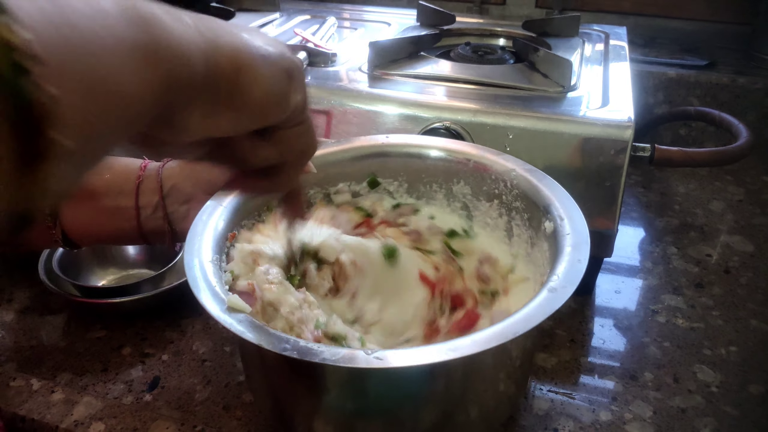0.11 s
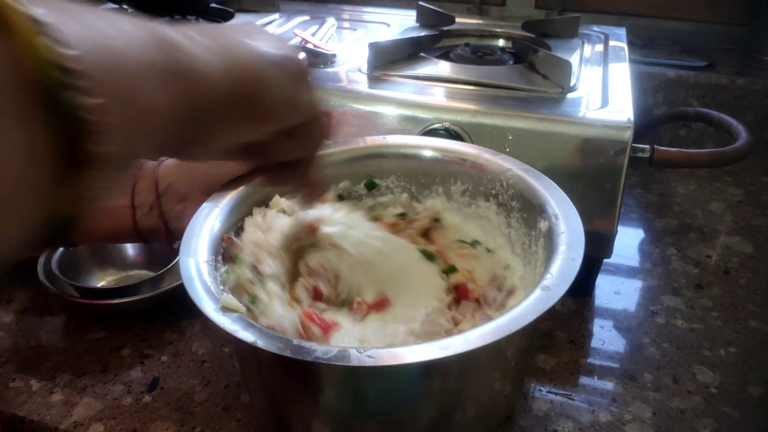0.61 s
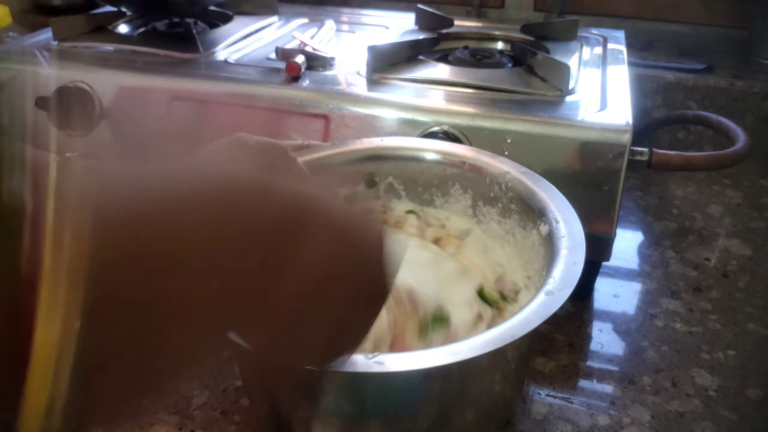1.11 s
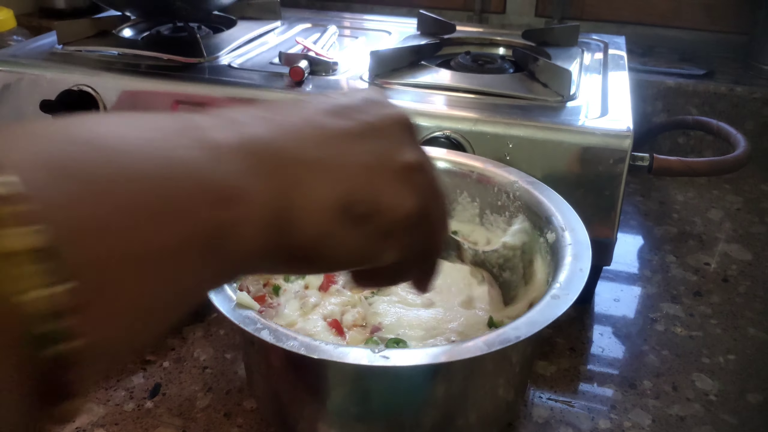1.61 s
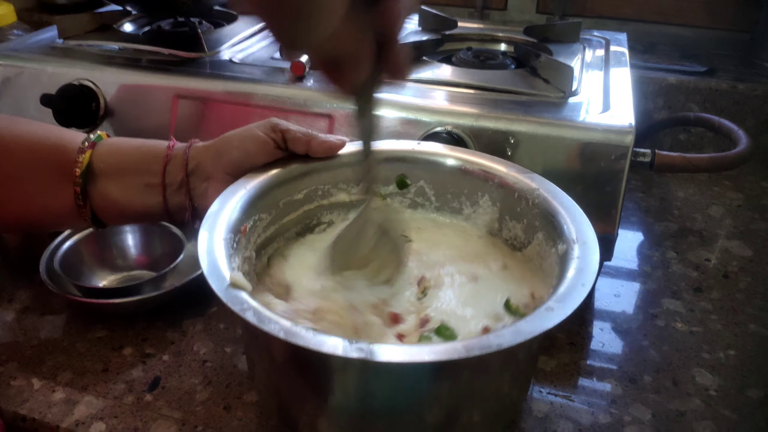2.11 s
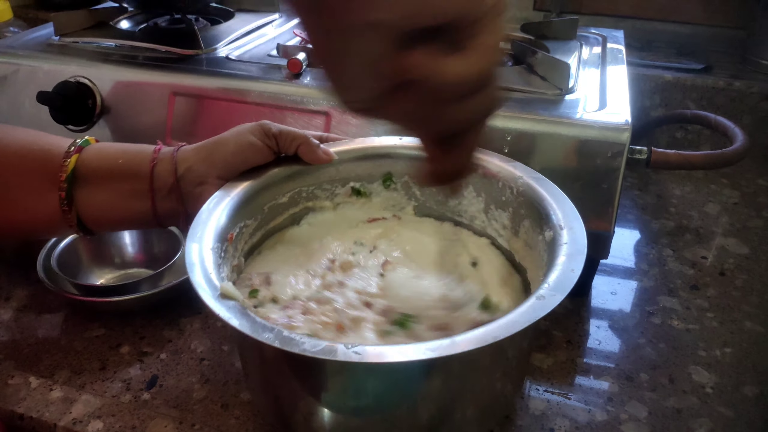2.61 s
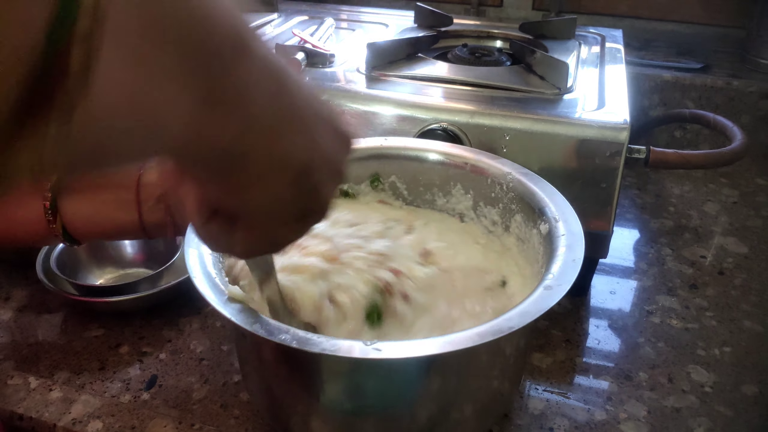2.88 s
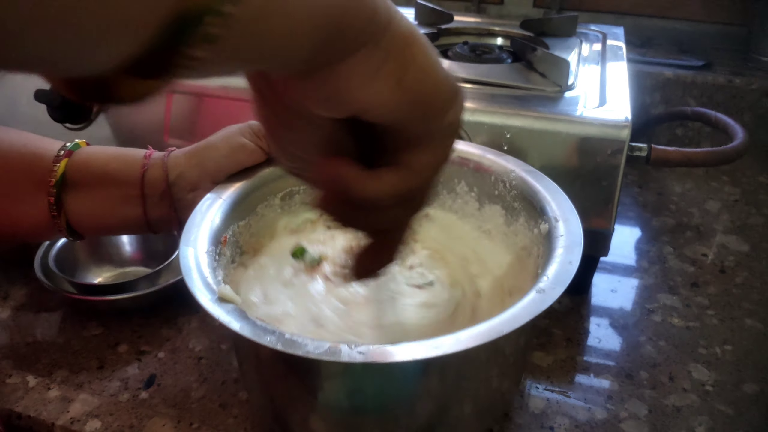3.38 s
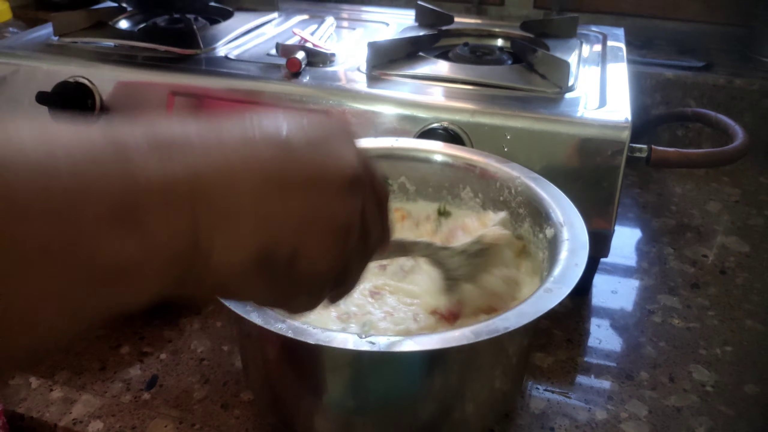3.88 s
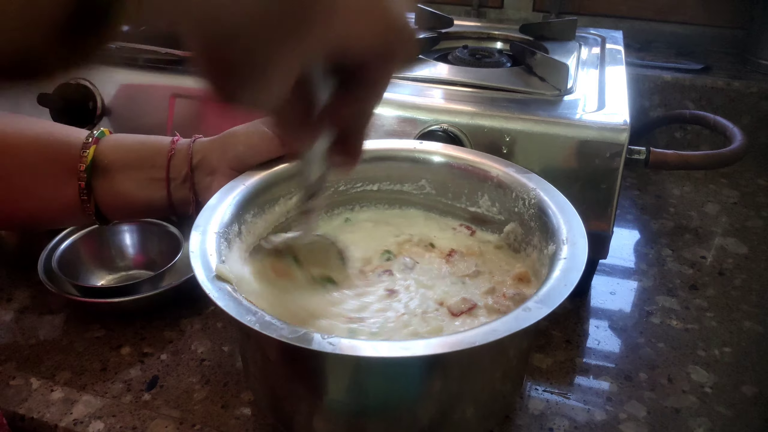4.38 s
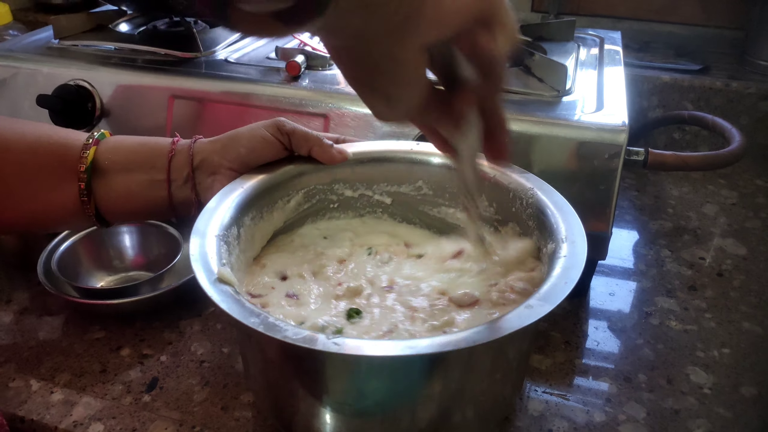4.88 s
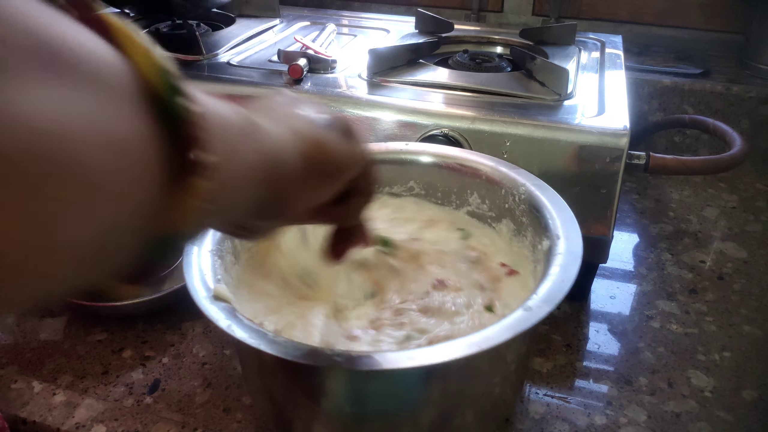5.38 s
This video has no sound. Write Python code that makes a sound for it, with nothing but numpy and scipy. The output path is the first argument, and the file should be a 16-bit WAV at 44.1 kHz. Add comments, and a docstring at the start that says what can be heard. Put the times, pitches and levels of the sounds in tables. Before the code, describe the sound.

Hand stirring of thick batter in a steel pot: sharp clinks, short gritty scrapes, low bumps on the counter, small squelches, quiet kitchen.

```python
"""Steel spoon scraping and clinking in a steel pot of thick batter, on a stone counter in a hard kitchen.
Friction is gritty noise through the wall modes; taps and landings are short forces through those modes.
Base, slab and handle ring as damped sines; air pockets squelch as gliding tones; the air hums as noise.
Impacts and squelches get diffuse room tails. A close phone's noise suppressor darkens the gaps.
"""
import sys
import numpy as np
from scipy import signal
from scipy.fft import rfft, irfft, next_fast_len
from scipy.io import wavfile
from scipy.ndimage import uniform_filter1d, map_coordinates

SR = 44100
rng = np.random.default_rng(int(sys.argv[2]) if len(sys.argv) > 2 else 0)


def ratio_of_db(decibels):
    """Turn decibels (scalar or array-like) into linear amplitude factors; 0 dB maps to 1."""
    return 10 ** (np.asarray(decibels, float) / 20)


def waveform_to_disk(signal):
    """Save audio, clipped to [-1, 1], as 16-bit WAV at the path in sys.argv[1]."""
    frames = np.transpose(np.atleast_2d(signal))
    scaled = np.clip(frames, -1, 1) * 32767
    samples = np.round(scaled).astype(np.int16)
    wavfile.write(sys.argv[1], SR, samples)


N = 242550

# Levels in the tables are relative dB unless noted.
# Kitchen hum spectrum. Each row: frequency in Hz, density in dB.
AIR_SPECTRUM = [(18, -49), (30, -27), (98, -10), (645, -19), (1420, -23.5), (2330, -32), (2870, -25),
                (14600, -47.5), (15800, -22.5)]
# Hum level. Each row: time in seconds, rms in dB.
AIR_LEVEL = [(0, -52.5), (3, -63), (4.001, -56), (5.5, -67.5)]
# Wall whine under the moving batter, response applied twice. Each row: centre in Hz, width in Hz, level in dB.
WHINE_MODES = [(1780, 76, -7), (2132, 87, -5), (2713, 69, -10.5)]
# Whine level. Each row: time in seconds, rms in dB.
WHINE_LEVEL = [(0, -57.5), (1.5, -60), (2.4, -59.5), (3.2, -60.5), (4, -66), (4.6, -65.5), (5, -60.5),
               (5.5, -74)]
# Room decay. Each row: frequency in Hz, t60 in seconds.
KITCHEN_T60 = [(100, 1), (300, 0.47), (1200, 0.49), (3000, 0.59), (5000, 0.32), (12000, 0.43)]
# Air pockets closing in the batter. Each row: start in seconds, level in dB, first pitch in Hz,
# last pitch in Hz, length in seconds.
SQUELCHES = [(.36, -53, 1112, 1200, 0.092), (0.428, -45.5, 1527, 1530, 0.018),
             (0.46, -46.5, 2630, 3015, 0.025), (1.847, -47.5, 386, 418.7, 0.049),
             (1.963, -46, 610, 440, 0.058), (2.025, -44.5, 289.5, 276.3, 0.012),
             (2.588, -58, 1202, 1310, 0.091), (2.633, -60, 453, 480, 0.044), (2.765, -53, 791.5, 801, 0.07),
             (2.808, -50, 1200, 1283, 0.07), (2.812, -60.5, 273.2, 269.5, 0.11),
             (4.152, -48, 341, 273, 0.11), (4.355, -59.5, 1176, 1152, 0.049),
             (4.839, -59.5, 1182, 1200, 0.15), (4.847, -57.5, 378.3, 439, 0.11)]
# Pot base landing on stone. Each row: start in seconds, base and slab level in dB, boom level in dB,
# wall jolt level in dB, rise of the base ring in seconds.
THUDS = [(0.003, -54.5, -42, -27, 0.0089), (0.139, -23, -29.5, -23.5, 0.0029),
         (0.543, -26.5, -42.5, -27.5, 0.0053), (1.066, -27.5, -34.5, -27, 0.0062),
         (1.133, -36.5, -70.5, -34, 0.0039), (3.051, -23, -31, -28, 0.0037),
         (3.517, -28.5, -49, -30.5, 0.002), (3.771, -30, -43.5, -30.5, 0.0012),
         (3.801, -35.5, -52, -54.5, 0.0038), (5.106, -40.5, -72, -30, 0.0048),
         (5.393, -28, -51, -16, 0.0011), (5.434, -24.5, -33.5, -27, 0.0012)]
# Colour of a landing's jolt on the wall. Each row: frequency in Hz, level in dB.
JOLT_COLOUR = [(400, 0.5), (900, -2.5), (2100, -4.5), (4000, -37.5)]
# Pot base modes. Each row: frequency in Hz, level in dB, t60 in seconds.
BASE_MODES = [(121, -7, 0.13), (175.8, -16, 0.3), (331.6, -6.5, 0.18), (367.2, -7.5, 0.14),
              (386, -10.5, 0.026), (486.5, -19, 0.24)]
# Stone counter modes. Each row: frequency in Hz, level in dB, t60 in seconds.
SLAB_MODES = [(250, 0, .42), (280, 5, .17)]
# Pot wall modes, damped by batter. Each row: centre in Hz, width in Hz, level in dB.
POT_MODES = [(390.3, 29, 1), (499.3, 14, 3), (668.6, 20, -5), (738.3, 14, 0), (901, 12, -7.5),
             (1104, 20, -6.5), (1163.5, 19, -4), (1226, 22, -2), (1470, 21, -15), (1954, 31, 5),
             (2270, 8.5, -1), (3130, 110, 0), (4794, 230, -3.5)]
# Spoon taps on the wall. Each row: start in seconds, knock level in dB, height (0 base, 1 rim),
# tick level in dB, tick slope above its centre in dB per octave.
CLINKS = [(0.0188, -32, 0.52, -12.5, -10.5), (0.1325, -23.5, 0.36, -36.5, -19),
          (0.4544, -22.5, 1.1, -49, -9), (0.509, -53.5, 1.4, -34, -6.5), (0.5505, -16.5, 0.11, -27, -17),
          (0.6796, -6.5, 0.31, -8, -4.5), (0.848, -30, 0.97, -32.5, 2), (0.903, -53, .8, -37, -3),
          (1.1862, -11, .5, -20, -8), (1.279, -62.5, 0.88, -32, 1), (1.4509, -67, .9, -45, 6),
          (1.9834, -28.5, 0.92, -33, 7), (2.2019, -66, 1, -37.5, 1), (3.0253, -53, 0.41, -32, -1),
          (3.0503, -26.5, 0.25, -27, -3), (3.0575, -22.5, 0.4, -40.5, 2), (3.0743, -17.5, 0.4, -32.5, -12),
          (3.0875, -5, .44, -30, -12), (3.6106, -19, .55, -40, -4), (3.6286, -20, 0.31, -47.5, -13),
          (3.716, -65, 0.85, -45, 7.5), (3.77, -54, 0.083, -43, 2.5), (3.836, -66, 1.1, -52, -13.5),
          (3.917, -36, 0.9, -30.5, -16.5), (3.926, -26, 1, -43, -10), (4.7214, -37.5, 1.2, -43, -13.5),
          (4.777, -33, 1.05, -48, 13), (5.0579, -61.5, 0.52, -24.5, -13), (5.107, -28, .66, -50, -6),
          (5.3375, -26.5, 1.2, -26.5, 3.5), (5.38, -32, .9, -44, -9.5), (5.3925, -11, 1.11, -17, -9.5),
          (5.393, -12, -0.046, -53, -11.5), (5.434, -17.5, .4, -46, -11.5)]
# Handle tipping the rim. Each row: start in seconds, level in dB.
TINKS = [(3.338, -13.5)]
# Spoon handle modes. Each row: frequency in Hz, level in dB, t60 in seconds.
HANDLE_MODES = [(1934, -3, 0.023), (2030, -2, 0.023), (2970, -28.5, 0.068), (5035, -3, 0.02),
                (5950, -19, 0.026), (7900, -9, 0.0095), (10500, -18.5, 0.017)]
# Spoon sliding along the steel. Each row: start in seconds, length in seconds, level in dB,
# swell by the end in dB, edge in dB (scaled per friction layer).
STROKES = [(0.0, 0.0074, -48, -2, 6), (0.01, 0.031, -44, -5.5, -16.5), (0.126, 0.048, -41.5, 0.5, -2.5),
           (0.277, .09, -58, 9, 1), (0.386, 0.079, -57, 5, 3), (0.539, 0.077, -46, 4.5, -1.5),
           (0.679, .01, -33, -3, -2), (0.74, 0.15, -53, 0, -3.5), (0.889, 0.41, -55.5, 3.5, -6.5),
           (1.04, 0.12, -44.5, -9, -4), (1.168, 0.053, -44, -10, 3), (1.782, 0.058, -56.5, 4, 10),
           (1.827, .13, -51.5, 4, -2), (1.83, 0.045, -54, -4.5, -24.5), (2.191, 0.014, -52, -6.5, -2.5),
           (2.519, 0.098, -61, 8.5, 2), (2.629, 0.15, -55, 4.5, 6.5), (2.671, 0.041, -65.5, -6, -6.5),
           (2.798, 0.17, -55, 0.5, -2.5), (3.027, 0.084, -49.5, 1.5, -4.5), (3.134, 0.18, -56.5, 3, -3.5),
           (3.335, .012, -43, -1, -7), (3.403, 0.074, -53.5, 5.5, 2), (3.492, 0.2, -48.5, -7, -2.5),
           (3.716, 0.18, -62, -7, -6.5), (3.91, 0.049, -46, -6, -14), (4.107, 0.093, -54, 4, 5.5),
           (4.245, 0.14, -60.5, 7, 12), (4.713, 0.011, -59, -1, 4), (4.807, 0.12, -59.5, 5.5, 7.5),
           (4.924, 0.39, -50.5, -8.5, 2), (5.081, 0.39, -45.5, -16, -6.5), (5.296, 0.083, -47, -7, -9),
           (5.392, .012, -39, -2, 1), (5.416, 0.067, -47.5, -7, -6.5)]
# Low friction hiss. Each row: frequency in Hz, density in dB.
RASP_SPECTRUM = [(2000, -42.5), (2700, -25.5), (3300, -31.5), (3950, -14.5), (4350, -4.5), (5000, -3),
                 (5900, -9), (6800, -23), (8000, -16.5), (16000, -120)]
# High friction hiss. Each row: frequency in Hz, density in dB.
FIZZ_SPECTRUM = [(3530, -66.5), (6000, -10), (8130, -7), (9260, -7), (12200, -4.5), (13300, -11.5),
                 (14900, -3.5), (15800, -13)]
# Rubbed wall, response applied twice. Each row: centre in Hz, width in Hz, level in dB.
RUBBED_MODES = [(1200, 280, 0), (1688, 300, 2.5), (2140, 160, 4), (2640, 110, -3), (2550, 440, -3),
                (3460, 50, 2)]
# Left-right difference of the scrape's treble. Each row: time in seconds, gain in dB.
SCRAPE_SIDE = [(4.7, -34.5), (4.8, -16.5)]
# Microphone port response. Each row: frequency in Hz, gain in dB.
MIC_RESPONSE = [(35, -8.5), (80, -1), (2400, 4.5), (3500, -3), (4300, 1)]

RING_SAMPLES, ECHO_SAMPLES = SR * 2 // 3, SR * 2 // 5
SMOOTH_DB, STREAKY_DB = 2, 4.6  # rms depth of patches in pitch and time
FOOT_HZ, RIM_HZ = 570, 2320  # knock pitch at base and rim
NARROW_DB = 5.5  # knock loss one octave off pitch, growing as the square
TICK_HZ, TICK_SKIRT_DB_PER_OCT = 4700, 10  # tick centre; loss below it
BELLY_HEIGHT, BELLY_SPAN = 0.55, 0.08  # taps at mid height make the wall sing
BELLY_HZ, BELLY_DB, BELLY_OCTAVES = 1196, 2, 0.15
ATTACK_S, DRAG_ATTACK_S = 0.034, 0.059  # at most a third of the stroke
RASP_FADE_DB_PER_S, FIZZ_FADE_DB_PER_S, RING_FADE_DB_PER_S = 113, 170, 120
TOP_HZ, EDGE_HZ = 15700, 16700  # faint above the first, silent above the second


def unit(x):
    """Scale to rms 1."""
    return x / np.sqrt(np.mean(x ** 2) + 1e-20)


def along(points, hz):
    """Read (Hz, value) points on a log frequency axis."""
    f, value = np.transpose(points)
    return np.interp(np.log(hz + 1), np.log(f + 1), value)


def over_time(points):
    """Gain per sample from (seconds, dB) points."""
    return ratio_of_db(np.interp(np.arange(N) / SR, *np.transpose(points)))


def filtered(x, response):
    """Multiply the spectrum of x by a function of frequency."""
    size = 2 * next_fast_len(x.shape[-1] // 2 + 4096)
    spectrum = rfft(x, size) * response(np.fft.rfftfreq(size, 1 / SR))
    return irfft(spectrum, size)[..., :x.shape[-1]]


def causal(gain):
    """Minimum-phase response with this gain, by folding the cepstrum."""
    cepstrum = irfft(np.log(gain + 1e-6))
    half = len(cepstrum) // 2
    cepstrum[1:half] *= 2
    cepstrum[half + 1:] = 0
    return np.exp(rfft(cepstrum))[:len(gain)]


def resonances(modes, f):
    """Sum of second-order band-pass modes with alternating signs."""
    total = 0
    for k, (centre, width, db) in enumerate(modes):
        mode = 1j * f * width / (centre ** 2 - f ** 2 + 1j * f * width)
        total = total + (-1) ** k * ratio_of_db(db) * mode
    return total


def gritty(grit_db, patchy_db, tick, size, count=3):
    """Noise modulated by grains, by patches (count bins by size frames) and by sparse loud ticks."""
    z = signal.stft(rng.standard_normal(N), nperseg=256)[2]
    field = uniform_filter1d(rng.standard_normal(z.shape), size=count, axis=0)
    field = uniform_filter1d(field, size=size, axis=1)
    noise = unit(signal.istft(z * ratio_of_db(patchy_db * unit(field)), nperseg=256)[1][:N])
    grains = uniform_filter1d(rng.standard_normal(N), size=40)
    # hard bits caught under the spoon, 120 per second on average
    tick_size = ratio_of_db(12 + 3 * np.minimum(rng.exponential(size=N), 2))
    ticks = (rng.random(N) < 120 / SR) * tick_size
    return unit(noise * ratio_of_db(grit_db * unit(grains)) + tick * ticks)


def add(out, s, sound):
    """Mix in from 64 samples before s, the lead-in that blow() pads."""
    part = out[max(round(s * SR) - 64, 0):][:len(sound)]
    part += sound[:len(part)]


def room_tail():
    """Fresh diffuse noise tail; each frequency decays at its own rate."""
    hz, t, z = signal.stft(rng.standard_normal(ECHO_SAMPLES), SR, nperseg=256)
    decay = ratio_of_db(-60 * t / along(KITCHEN_T60, hz)[:, None])
    tail = signal.istft(z * decay, SR, nperseg=256)[1][:ECHO_SAMPLES]
    # counter and stove answer first and loudest
    tail *= 1 + 1.4 * np.exp(-np.arange(len(tail)) / (0.0034 * SR))
    tail[:round(0.002 * SR)] = 0
    tail /= np.linalg.norm(tail)
    return filtered(tail, lambda f: 1 / np.sqrt(1 + (f / 5000) ** 2))  # walls swallow treble


def in_room(dry, wet_db):
    """A sound plus its convolution with a fresh room tail."""
    wet = signal.fftconvolve(dry, room_tail())
    return np.pad(dry, (0, ECHO_SAMPLES - 1)) + ratio_of_db(wet_db) * wet


def rung(modes, rise_s, scatter_db, waver_db):
    """Damped sines of scattered strength, wavering as close neighbours beat."""
    t = np.arange(RING_SAMPLES) / SR
    ring = np.zeros(RING_SAMPLES)
    for hz, db, t60 in modes:
        waver = map_coordinates(rng.standard_normal(40), [t * 24])  # 24 points per second
        level_db = db + scatter_db * rng.standard_normal() + waver_db * waver - 60 * t / t60
        ring += ratio_of_db(level_db) * np.sin(2 * np.pi * hz * t)
    return ring * (1 - np.exp(-t / rise_s))


def blow(colour, chatter_db, ring):
    """One sharp force and its decaying chatter, coloured, partly through the wall modes."""
    t = np.arange(SR // 3) / SR
    force = ratio_of_db(chatter_db - 60 * t / 0.009) * rng.standard_normal(len(t))  # chatter t60 9 ms
    force[0] = 1
    force /= np.linalg.norm(force)
    points = [(60, -120)] + colour

    def struck_wall(f):
        shape = causal(ratio_of_db(along(points, f)) / np.sqrt(f + 100))
        return shape * (1 - ring + 4 * ring * resonances(POT_MODES, f))

    return filtered(np.pad(force, (64, 0)), struck_wall)


def strokes(offset_db, per_edge, attack_s, fade_db_per_s):
    """Gain of one friction layer: strokes rise, swell and fade, summed in power."""
    power = np.zeros(N // 32 + 2)
    t = np.arange(len(power)) * 32 / SR
    for s, length, db, swell_db, edge_db in STROKES:
        rise = np.clip((t - s) / min(attack_s, length / 3), 0, 1) ** 2
        swell = swell_db * np.clip((t - s) / length, 0, 1)
        fade = fade_db_per_s * np.maximum(t - s - length, 0)
        power += (rise * ratio_of_db(db + offset_db + per_edge * edge_db + swell - fade)) ** 2
    return np.interp(np.arange(N) / SR, t, np.sqrt(power))


def hum():
    """Kitchen air as band-wise wavering noise, plus the wall's soft whine as noise in narrow modes."""
    air = gritty(grit_db=-2.5, patchy_db=2.5, tick=0, size=40)
    air = unit(filtered(air, lambda f: ratio_of_db(along(AIR_SPECTRUM, f))))
    whine = gritty(grit_db=4, patchy_db=SMOOTH_DB, tick=0, size=40)
    whine = unit(filtered(whine, lambda f: resonances(WHINE_MODES, f) ** 2))
    return over_time(AIR_LEVEL) * air + over_time(WHINE_LEVEL) * whine


def squelches():
    """Each air pocket is a swelling, burbling tone with gliding, fluttering pitch."""
    out = np.zeros(N)
    for s, db, first_hz, last_hz, length in SQUELCHES:
        u = np.linspace(0, 1, round(length * SR))
        wobble = unit(uniform_filter1d(rng.standard_normal(len(u)), size=200))
        burble = unit(ratio_of_db(5.5 * wobble))
        swell = np.sin(np.pi * u ** 0.7) ** 2
        flutter = unit(uniform_filter1d(rng.standard_normal(len(u)), size=200))
        pitch_hz = first_hz + (last_hz - first_hz) * u + (20 + 0.018 * first_hz) * flutter
        tone = np.sin(2 * np.pi * np.cumsum(pitch_hz) / SR)
        add(out, s, ratio_of_db(db) * in_room(swell * burble * tone, wet_db=-2.5))
    return out


def drag():
    """A wet film sings in narrow streaks that follow the strokes late."""
    film = gritty(grit_db=-3.5, patchy_db=STREAKY_DB, tick=0.25, size=40, count=1)
    band = filtered(film, lambda f: resonances([(2890, 2700, 0)], f) ** 2)
    pull = strokes(0, 0.46, DRAG_ATTACK_S, RASP_FADE_DB_PER_S)
    return ratio_of_db(-52.5) * unit(pull ** 1.6) * unit(band)  # power 1.6 widens the swings


def thuds():
    """Landings drum base and slab, jolt the wall and wake the lowest room mode."""
    out = np.zeros(N)
    for s, db, boom_db, jolt_db, rise_s in THUDS:
        colour = [(hz, jolt_db + shape_db) for hz, shape_db in JOLT_COLOUR]
        jolt = blow(colour, chatter_db=-24.5, ring=0.081)
        base = rung(BASE_MODES, rise_s, scatter_db=2, waver_db=3)
        slab = rung(SLAB_MODES, rise_s=0.011, scatter_db=1.5, waver_db=2.5)
        boom = rung([(91, 0, 0.9)], rise_s=0.037, scatter_db=1, waver_db=2)  # 91 Hz, t60 0.9 s
        add(out, s, ratio_of_db(56.0) * in_room(jolt, wet_db=7.5))
        add(out, s, ratio_of_db(db) * in_room(base, wet_db=-1))
        add(out, s, ratio_of_db(db) * in_room(slab, wet_db=-8))
        add(out, s, ratio_of_db(boom_db) * boom)
    return out


def clink_colour(knock_db, height, tick_db, top_db):
    """Force spectrum of a tap: a knock pitched by height plus a bright tick."""
    hz = np.geomspace(300, 10000, num=60)
    knock_hz = FOOT_HZ * (RIM_HZ / FOOT_HZ) ** height
    off_belly = (height - BELLY_HEIGHT) / BELLY_SPAN
    off_pitch = np.log2(hz / BELLY_HZ) / BELLY_OCTAVES
    belly_db = BELLY_DB * np.exp(-off_belly ** 2 - off_pitch ** 2)
    knock = ratio_of_db(knock_db - NARROW_DB * np.log2(hz / knock_hz) ** 2 + belly_db)
    above = np.log2(hz / TICK_HZ)
    tick = ratio_of_db(tick_db + np.where(above > 0, top_db, TICK_SKIRT_DB_PER_OCT) * above)
    return list(zip(hz, 20 * np.log10(knock + tick)))


def clinks():
    """Taps crack and ring the wall, the handle sings briefly; also returns the dry cracks."""
    out, direct = np.zeros(N), np.zeros(N)
    # belly modes ring twice as long as their width implies
    belly = [(c, db, 2 * np.log(1000) / (np.pi * w)) for c, w, db in POT_MODES if 1135 < c < 1300]
    for s, knock_db, height, tick_db, top_db in CLINKS:
        colour = clink_colour(knock_db, height, tick_db, top_db)
        crack = ratio_of_db(56.5) * blow(colour, chatter_db=-14, ring=0.36)
        add(out, s, in_room(crack, wet_db=0.0))
        add(direct, s, crack)
        if abs(height - BELLY_HEIGHT) < BELLY_SPAN:
            song = rung(belly, rise_s=0.0015, scatter_db=1.5, waver_db=3)
            add(out, s, ratio_of_db(knock_db - 24) * in_room(song, wet_db=-4))
    for s, db in TINKS:
        handle = rung(HANDLE_MODES, rise_s=0.0011, scatter_db=2, waver_db=2.0)[:SR // 8]
        add(out, s, ratio_of_db(db) * in_room(handle, wet_db=-7))
    return out, direct


def stir():
    """Friction grains rasp, fizz and excite the wall modes, each layer under its stroke gain."""
    rasp = gritty(grit_db=2, patchy_db=SMOOTH_DB, tick=0.93, size=14)
    rasp = unit(filtered(rasp, lambda f: ratio_of_db(along(RASP_SPECTRUM, f))))
    fizz = gritty(grit_db=2.5, patchy_db=SMOOTH_DB, tick=0.5, size=10)
    fizz = unit(filtered(fizz, lambda f: ratio_of_db(along(FIZZ_SPECTRUM, f))))
    ring = gritty(grit_db=1.0, patchy_db=STREAKY_DB, tick=0.61, size=40, count=1)
    ring = unit(filtered(ring, lambda f: resonances(RUBBED_MODES, f) ** 2))
    # a flat spoon rings the wall more than its edge does
    return (strokes(0, 0, ATTACK_S, RASP_FADE_DB_PER_S) * rasp
            + strokes(0, 0.8, ATTACK_S, FIZZ_FADE_DB_PER_S) * fizz
            + strokes(-6.5, -0.68, ATTACK_S, RING_FADE_DB_PER_S) * ring)


def scene():
    """Sum all sources; left and right differ only in the treble of cracks and scrape."""
    taps, direct = clinks()
    scrape = stir()
    mid = hum() + squelches() + drag() + thuds() + taps + scrape
    side = np.roll(ratio_of_db(-24.5) * direct + over_time(SCRAPE_SIDE) * scrape, 9)  # 9 samples late
    side = filtered(side, lambda f: f > 4500)
    return np.array([mid + side, mid - side])


def suppress(x, over_db, depth_db, keep):
    """Per band, subtract the quiet level (8th percentile over time) by a gain from smoothed power."""
    z = signal.stft(x, nperseg=512)[2]
    power = uniform_filter1d(np.mean(np.abs(z) ** 2, 0), size=3, axis=0)
    quiet = np.percentile(uniform_filter1d(power, size=9, axis=1), 8, axis=1)[:, None]
    power = signal.lfilter([1 - keep], [1, -keep], power, axis=1)
    gain = 1 - ratio_of_db(over_db) * np.sqrt(quiet / (power + 1e-20))
    gain = np.maximum(gain, ratio_of_db(depth_db))
    return signal.istft(z * gain, nperseg=512)[1][:, :N]


def band_limit(x):
    """A steep low-pass at the top of the band."""
    return signal.sosfilt(signal.butter(12, 16830, fs=SR, output="sos"), x)


def record(dry):
    """The phone suppresses steady noise, colours through its microphone port and cuts the top."""
    clean = suppress(dry, over_db=3.5, depth_db=-10.0, keep=0.8)

    def port(f):
        return ratio_of_db(along(MIC_RESPONSE, f)) * np.where(f < TOP_HZ, 1, 0.03) * (f < EDGE_HZ)

    return band_limit(filtered(clean, port))


dry = scene()
out = record(dry)
waveform_to_disk(out)
```